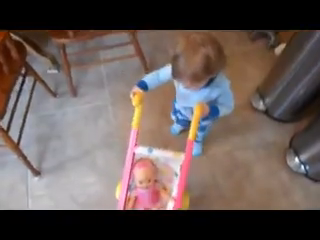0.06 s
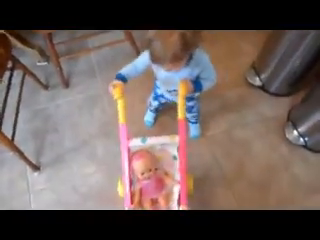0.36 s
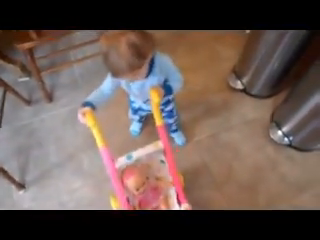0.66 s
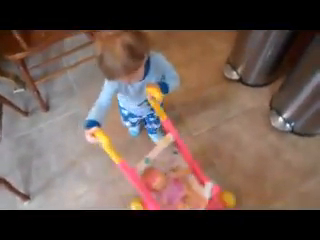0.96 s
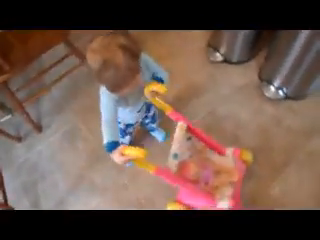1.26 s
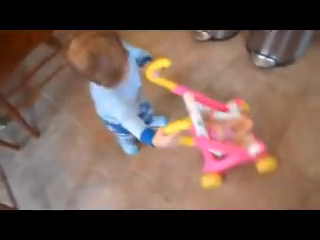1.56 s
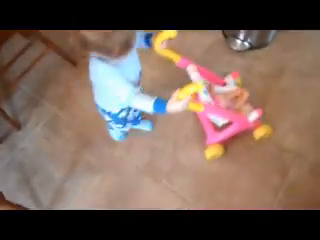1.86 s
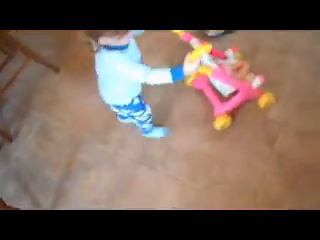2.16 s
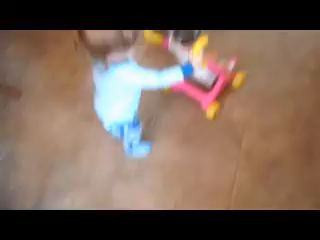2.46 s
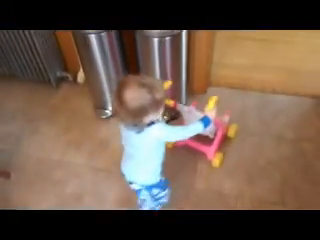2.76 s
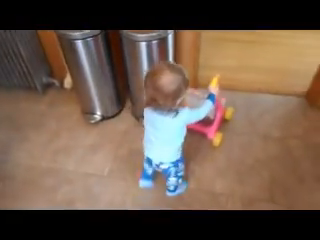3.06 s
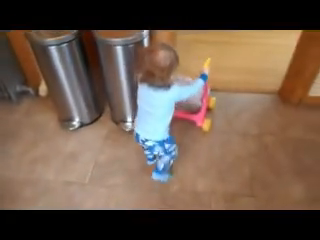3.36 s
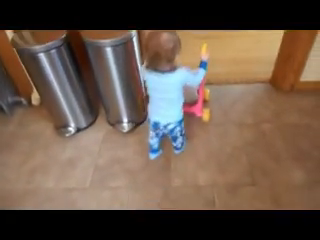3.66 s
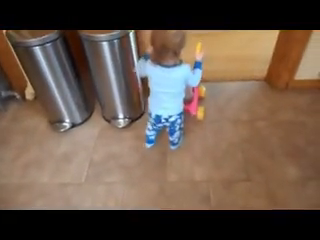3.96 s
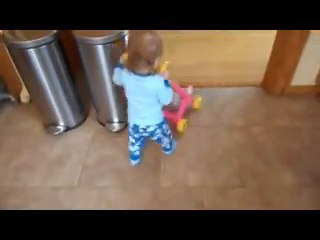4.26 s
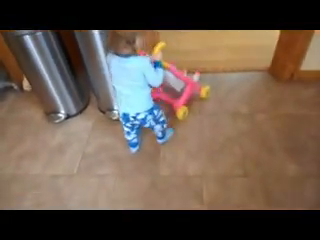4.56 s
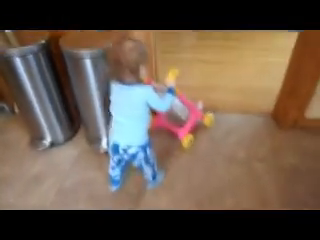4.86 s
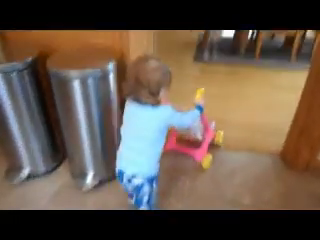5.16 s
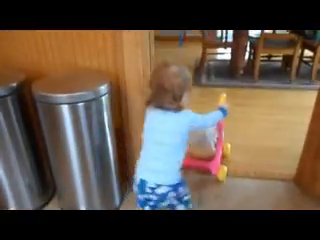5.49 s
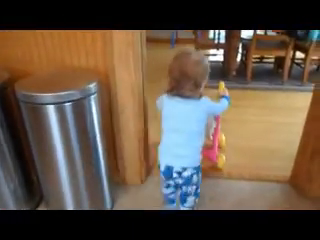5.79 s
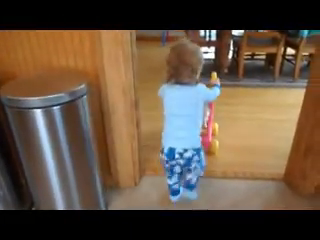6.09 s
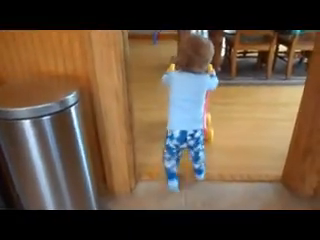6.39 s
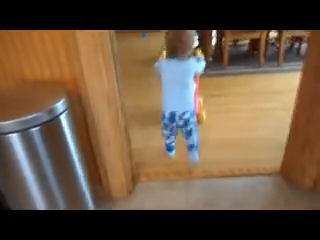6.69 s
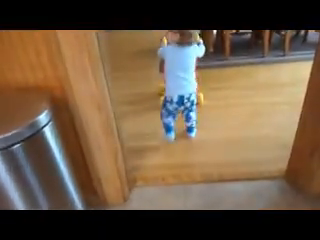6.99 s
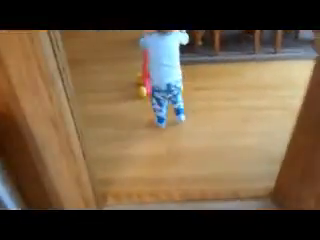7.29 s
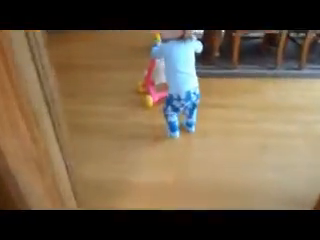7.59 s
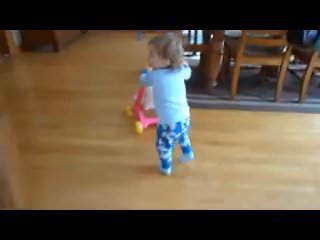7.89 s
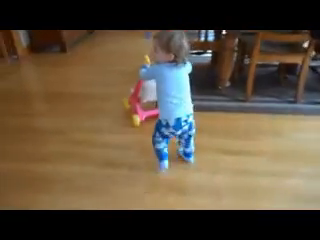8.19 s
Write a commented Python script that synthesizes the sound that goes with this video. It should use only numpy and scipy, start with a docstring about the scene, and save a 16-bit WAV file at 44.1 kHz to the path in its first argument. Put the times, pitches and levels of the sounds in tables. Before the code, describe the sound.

In a slightly echoing kitchen, plastic wheels scrub and squeal thinly on tile as a toy stroller rattles along, shove by shove. A hard bang against a door frame briefly overloads the hand-held microphone, and the rolling stops. The stroller then sets off again with several clacks and rolls more quietly over wooden boards. Faint hiss and hum lie underneath, and everything is heard in the left channel.

```python
"""A live kitchen, heard from a small hand-held camera following a toddler with a toy stroller; left channel only.
Over faint hiss and hum, hollow plastic wheels rumble, scrub and sing through a first turn on the tiles,
shove by shove, while the loose frame clacks and ticks. At 3.4 s the stroller hits a door frame: the
preamplifier overloads and the gain control ducks. After a pause the child pushes on, and from about 6 s
a wooden floor drums under the wheels."""
import sys
import numpy as np
from scipy import signal
from scipy.io import wavfile
from scipy.ndimage import uniform_filter1d

SR = 44100
rng = np.random.default_rng(int(sys.argv[2]) if len(sys.argv) > 2 else 0)


def file_out(sig):
    """Save sig as 16-bit WAV at sys.argv[1]."""
    # one column per channel
    cols = np.atleast_2d(sig).T
    # limit, then scale
    lim = np.clip(cols, -1, 1)
    pcm = np.round(lim * 32767).astype(np.int16)
    wavfile.write(sys.argv[1], SR, pcm)


N = 372204
TIME = np.arange(N) / SR

# resonances of the tube frame and of its small hard parts: pitch_hz, width_hz, boost_db
FRAME_MODES = [(545, 220, 2.5), (1032, 106, 14), (1850, 740, -3), (2160, 1700, 5.5), (3054, 230, 7.5),
               (4520, 97, 5), (5430, 57, 7.5)]
TICK_MODES = [(4800, 720, 6.5), (5400, 190, 5.3), (5800, 43, 11), (6600, 190, 3.7), (8200, 78, 14),
              (9580, 170, 13.3)]
# broad spectra of a knock and of a tick: frequency_hz, gain_db
KNOCK_SPECTRUM = [(40, -41.5), (130, -18.5), (220, -15.5), (500, -1), (700, 0), (1000, -0.5), (2600, 8.5),
                  (4000, -1), (6000, -3), (8500, -14.5), (10200, -30), (11500, -52)]
TICK_SPECTRUM = [(500, -26), (3000, 7.5), (3800, -13.5), (4700, 6), (6500, 5), (8600, -5.5), (10300, -21),
                 (11500, -50)]


def amp(db):
    """Decibels to gain."""
    return 10 ** (np.asarray(db) / 20)


def unit(x):
    """Scales to rms 1."""
    return x / np.sqrt(np.mean(x ** 2) + 1e-20)


def read(points, hz):
    """Reads a table on a log-frequency axis."""
    f, value = np.transpose(points)
    return np.interp(np.log(hz + 1), np.log(f + 1), value)


def add(mix, start_s, sound):
    """Mixes a sound in at its start time."""
    part = mix[max(round(start_s * SR), 0):][:len(sound)]
    part += sound[:len(part)]


def at_peak(x, db, size=256):
    """Scales a blow so that its loudest few milliseconds have this level."""
    return amp(db) * x / np.sqrt(uniform_filter1d(x ** 2, size).max() + 1e-20)


def body(spectrum, modes=(), size=4096):
    """Minimum-phase impulse response of a broad spectrum with resonances standing on it."""
    hz = abs(np.fft.fftfreq(size, 1 / SR))
    peaks = sum((amp(db) ** 2 - 1) / (1 + (2 * (hz - f) / width) ** 2) for f, width, db in modes)
    gain = amp(read(spectrum, hz)) * np.sqrt(np.maximum(1 + peaks, 0.1))
    return np.fft.ifft(np.exp(np.conj(signal.hilbert(np.log(gain))))).real


def ring(x, response):
    """Plays an excitation through a body."""
    return signal.oaconvolve(x, response)[:len(x)]


def resonate(x, hz, width_hz):
    """A resonance of gain 1 at a fixed or moving pitch."""
    carrier = np.exp(2j * np.pi * np.cumsum(hz * np.ones(len(x))) / SR)
    pole = np.exp(-np.pi * width_hz / SR)
    return 2 * (carrier * signal.lfilter([1 - pole], [1, -pole], x / carrier)).real


def wander(per_s):
    """A smooth random curve of rms 1."""
    knots = rng.standard_normal(N // 20)
    return unit(np.interp(TIME * per_s, np.arange(len(knots)), knots))


def contacts(per_s, spread_db):
    """Random tiny impacts, a few harder than the rest."""
    strength = amp(spread_db * np.minimum(rng.exponential(1, N), 4)) * rng.choice([-1, 1], N)
    return strength * (rng.random(N) < per_s / SR)


def chatter(t60, press_s=0.0051, softness=0.014, size=8192):
    """One blow: loose joints buzz during contact, then settle; a looser blow starts more softly."""
    t = np.arange(size) / SR
    onset = 1 - np.exp(-t / (softness * t60))
    decay = amp(-60 * np.maximum(t - press_s, 0) / t60)
    return rng.standard_normal(size) * onset * decay


def taps(part, per_s, spread_db, t60):
    """A part is tapped at an uneven beat and with uneven strength."""
    out = np.zeros(N)
    for beat, (late, strength) in enumerate(rng.random((400, 2))[:int(N / SR * per_s)]):
        tap = ring(chatter(t60, size=4096), part)
        add(out, (beat + late) / per_s, at_peak(tap, spread_db * (2 * strength - 1)))
    return out


def room_tone():
    """Steady hiss of the house and the faint hum of a kitchen appliance."""
    hiss_spectrum = [(18, -54), (30, -26), (108, -24.5), (304, -10.5), (335, -8.5), (370, -11), (1070, -10),
                     (1790, -13.5), (3230, -13), (3840, -12.5), (4670, -17), (8040, -25), (10800, -45),
                     (14000, -85), (22000, -120)]  # colour of the hiss: frequency_hz, gain_db
    hum_tones = [(339.1, -74)]  # the appliance: pitch_hz, level_db
    hiss = unit(ring(rng.standard_normal(N), body(hiss_spectrum)))
    hum = sum(amp(db) * np.sqrt(2) * np.sin(2 * np.pi * hz * TIME) for hz, db in hum_tones)
    return amp(-50) * hiss + hum


def microphone_rumble():
    """Low rumble and dull thumps at the microphone, two of them under hard knocks."""
    restlessness = [(0, -92), (3.0, -82), (4.0, -102), (6.5, -99), (7.3, -77), (8.44, -77)]  # rumble of the hand on the camera: time_s, level_db
    thumps = [(0.45, -78, .15), (3.35, -53, 0.15), (5.18, -51, .08), (7.08, -57, .15), (7.7, -59, .17),
              (8.33, -67, .16)]  # dull low thumps: start_s, level_db, length_s
    low_end = body([(10, 2), (30, -1), (70, -3), (200, -42), (800, -67)])
    rumble = unit(ring(rng.standard_normal(N), low_end))
    envelope = amp(np.interp(TIME, *np.transpose(restlessness)))
    for start_s, db, length_s in thumps:
        add(envelope, start_s, amp(db) * np.hanning(round(length_s * SR)))
    return envelope * rumble


def reflections(build_s=0.0045, echoes_per_s=4000):
    """Dense echoes from hard walls and floor, each band dying at its own speed."""
    decay_times = [(100, 0.71), (500, 0.4), (1000, 0.58), (3000, 0.49), (6000, 0.44), (10000, 0.34)]  # reverberation of the kitchen: frequency_hz, t60_s
    echoes = rng.standard_normal(SR) * (rng.random(SR) < echoes_per_s / SR)
    hz, t, bands = signal.stft(echoes, SR, nperseg=256)
    decay = amp(-60 * t / read(decay_times, hz)[:, None])
    tail = signal.istft(bands * decay, SR, nperseg=256)[1][:SR]
    tail *= 1 - np.exp(-np.arange(SR) / SR / build_s)
    return tail / np.linalg.norm(tail)


def kitchen_reverb(levels, wet_db, walls=3):
    """The frame sends a different sound toward each wall, so the echoes blend into a smooth tail."""
    tails = sum(ring(stroller(levels, roll_db=-0.5), reflections()) for _ in range(walls))
    return amp(wet_db) * tails / np.sqrt(walls)


def squeaks(gain_db, waver=0.029):
    """A wheel sticks and slips: a short chirp of unsteady pitch."""
    chirps = [(0.789, 0.044, 3500, -46), (1.063, 0.011, 3150, -44.5), (1.524, 0.01, 4420, -36),
              (1.917, 0.017, 1090, -38), (1.925, 0.017, 2970, -40.5), (2.281, 0.011, 2970, -42.5),
              (2.48, 0.03, 4530, -38), (2.914, 0.061, 1198, -42), (5.516, 0.028, 4130, -40)]  # sticking wheel: start_s, length_s, pitch_hz, relative_db
    out, drift = np.zeros(N), wander(per_s=860)
    for start_s, length_s, hz, db in chirps:
        bend = 1 + waver * drift[round(start_s * SR):][:round(length_s * SR)]
        tone = np.sin(2 * np.pi * np.cumsum(hz * bend) / SR)
        add(out, start_s, amp(db) * tone * signal.windows.tukey(len(bend), 0.6))
    return amp(gain_db) * out


def ticks(gain_db):
    """Small hard parts click with a high, short ring."""
    clicks = [(0.124, -40, 0.14), (0.4127, -50, 0.04), (1.081, -33, 0.042), (1.1603, -32, 0.056),
              (1.327, -30.5, 0.027), (1.409, -30, 0.037), (1.5233, -25.5, 0.032), (1.5474, -27, 0.034),
              (1.5747, -23, 0.028), (1.9764, -37, 0.28), (2.413, -31.5, 0.058), (2.4856, -28, 0.11),
              (2.6146, -21, 0.019), (2.706, -25, 0.032), (3.1852, -29.5, .025), (4.287, -40, 0.055),
              (4.732, -32, 0.026), (4.853, -19.5, 0.046), (4.964, -28, 0.094), (5.136, -34, 0.044),
              (5.4307, -20, 0.016), (6.331, -41, 0.074), (7.09, -41, 0.063), (7.7808, -43.5, 0.043)]  # loose parts: start_s, relative_db, t60_s
    out, part = np.zeros(N), body(TICK_SPECTRUM, TICK_MODES)
    for start_s, db, t60 in clicks:
        add(out, start_s, at_peak(ring(chatter(t60), part), db))
    return amp(gain_db) * out


def rolling_levels(rise_s=0.065, swell_db_per_s=1.5, coast_db_per_s=93.5):
    """Gains of rumble, rattle and scrub: each shove rises, holds and coasts; skids add scrub."""
    shoves = [(-0.1, 0.092, -40, -42, -39.5), (0.075, 0.081, -48.5, -49, -44),
              (0.575, 0.14, -51, -52.5, -52.5), (0.779, 0.46, -51, -63, -45.5),
              (1.15, 0.34, -40.5, -40.5, -42), (1.475, .27, -38.5, -40.5, -41.5),
              (1.943, 0.23, -43.5, -36.5, -45), (2.307, .44, -41.5, -36, -42), (2.808, 0.64, -43, -34, -55),
              (4.273, .06, -48.5, -41, -45), (4.358, 0.15, -34, -27, -41.5), (4.768, 0.35, -46, -41.5, -45),
              (4.945, 0.14, -38.5, -31.5, -54), (5.157, 0.18, -37, -27, -39), (5.471, 0.046, -35, -42, -51),
              (5.716, 0.42, -45, -39.5, -52.5), (6.234, 0.84, -50, -42, -58.5),
              (7.028, 0.67, -52, -44, -63), (7.968, 0.27, -52.5, -50, -53),
              (8.135, 0.25, -47.5, -41.5, -64)]  # the child's pushes: start_s, length_s, rumble_db, rattle_db, scrub_db
    skids = [(0.117, 0.043, -37.5), (0.598, 0.041, -53), (0.78, .04, -53), (0.832, .04, -49),
             (6.802, 0.031, -34), (7.549, 0.062, -38.5), (7.646, 0.052, -40)]  # a wheel slides briefly: start_s, length_s, scrub_db
    levels = np.zeros((3, N))
    for start_s, length_s, *dbs in shoves:
        t = TIME - start_s
        swell_db = swell_db_per_s * np.clip(t, 0, length_s)
        coast_db = coast_db_per_s * np.maximum(t - length_s, 0)
        speed = np.clip(t / rise_s, 0, 1) * amp(swell_db - coast_db)
        levels = np.maximum(levels, amp(dbs)[:, None] * speed)
    for start_s, length_s, db in skids:
        slide = np.interp(TIME - start_s, [0, 0.005, length_s / 2, length_s], [0, 1, 0.7, 0])
        levels[2] += amp(db) * slide
    return levels


def wheel_song(scrub_gain, gain_db, width_hz=190, upper_hz=4400, flutter_db=5):
    """Stick and slip drive two modes of a dragged wheel; the upper one grows as the turn tightens."""
    first_turn = [(0.0, -6, 3014), (1.1, -2, 3060), (1.45, -2, 3000), (1.85, -4.5, 2910), (2.3, -25, 3020)]  # the lower mode through the turn: time_s, relative_db, pitch_hz
    time_s, db, hz = np.transpose(first_turn)
    slips = rng.standard_normal(N) * amp(2 * wander(per_s=100) + flutter_db * wander(per_s=25))
    lower, upper = (unit(resonate(resonate(slips, pitch, width_hz), pitch, width_hz))
                    for pitch in (np.interp(TIME, time_s, hz), upper_hz))
    upper_db = np.interp(TIME, [0.78, 0.88], [-13, -4])
    turn_db = np.interp(TIME, time_s, db, right=-120)
    return scrub_gain * amp(gain_db + turn_db) * (lower + amp(upper_db) * upper)


def wheel_wobble(levels, knock_db, tick_db):
    """Loose wheels knock on their axles as the stroller rattles, and tick when they are dragged."""
    _, rattle_gain, scrub_gain = levels
    hollow_mode = (1060, 300, 10)  # ring of a tapped wheel: pitch_hz, width_hz, boost_db
    floor_db = np.interp(TIME, [6.0, 6.3], [0, 1])  # harder taps on the wooden boards
    knocking = taps(body(KNOCK_SPECTRUM, FRAME_MODES + [hollow_mode]), per_s=14, spread_db=0.5, t60=0.042)
    ticking = taps(body(TICK_SPECTRUM, TICK_MODES), per_s=11, spread_db=-1, t60=0.03)
    return amp(knock_db + floor_db) * rattle_gain * knocking + amp(tick_db) * scrub_gain * ticking


def wheels(levels):
    """Floor grit and axle play pelt the wheels and frame; dragged wheels scrub sideways."""
    # broad spectra of wheels, boards, frame and dragged treads: frequency_hz, gain_db
    rumble_spectrum = [(40, -57), (110, -17.5), (200, -10), (330, -4), (480, 5), (720, 1), (1100, 1),
                       (2500, -42.5)]
    board_spectrum = [(40, -17.5), (75, -5.5), (120, -0.5), (210, 7), (300, -4), (600, -41)]
    rattle_spectrum = [(150, -22.5), (500, -31.5), (900, 2.5), (1200, 7), (2300, 5.5), (3200, 1), (3900, 1),
                       (5500, -3), (8000, -14.5), (11000, -46)]
    scrub_spectrum = [(200, -28.5), (900, -2.5), (2000, -0.5), (3700, -2), (5000, 0.5), (7000, -0.5),
                      (8800, -6), (10200, -21), (11500, -47.5)]
    wheel_modes = [(1006, 310, 10), (3030, 240, 11.4), (4470, 220, 7.2), (5120, 140, 8.6), (5660, 250, 7.9),
                   (6430, 210, 3), (8260, 460, 1.8)]  # hollow plastic resonances: pitch_hz, width_hz, boost_db
    board_share = [(5.5, -38), (6.0, -17.5), (6.6, -11.5), (8.44, -14)]  # wood drums, tiles do not: time_s, level_re_rumble_db
    rumble_gain, rattle_gain, scrub_gain = levels
    jolts = wander(per_s=70)  # uneven treads shake all parts together
    bumps = contacts(per_s=2200, spread_db=1) * amp(2.5 * jolts)
    boom = amp(np.interp(TIME, *np.transpose(board_share))) * unit(ring(bumps, body(board_spectrum)))
    rumble = unit(ring(bumps, body(rumble_spectrum))) + boom
    shakes = contacts(per_s=1000, spread_db=2) * amp(2.04 * jolts)
    rattle = unit(ring(shakes, body(rattle_spectrum, FRAME_MODES)))
    slips = contacts(per_s=4000, spread_db=3) * amp(jolts + 2 * wander(per_s=160))
    scrub = unit(ring(slips, body(scrub_spectrum, wheel_modes)))
    return amp(4.5) * (rumble_gain * rumble + rattle_gain * rattle) + amp(7) * scrub_gain * scrub


def knocks(gain_db, mode_db=10, mode_width_hz=300):
    """Each blow rings the frame; where it lands picks a boosted mode and the share of thud and crack."""
    # blows, the hardest at the doorway: start_s, mid_db, thud_re_mid_db, crack_re_mid_db, t60_s, mode_hz
    blows = [(0.3536, -40.5, -10, -13, 0.058, 3560), (1.1823, -13, -7, -15, 0.035, 2660),
             (1.1935, -22, -1, 0, 0.017, 3050), (1.3896, -29, -13, -26, 0.085, 2900),
             (1.575, -27, -7.5, -26, .04, 2920), (1.643, -23.5, -5, -26, 0.026, 2360),
             (1.9199, -32.5, -3.5, -7, 0.11, 1090), (2.0615, -24, -9, -4.5, 0.068, 2900),
             (2.0857, -27, -7, -10.5, 0.075, 2860), (2.133, -24.5, -3, -9.5, 0.077, 2320),
             (2.1614, -25, -2.5, -25, 0.052, 2220), (2.6217, -12.5, -9.5, -5.5, 0.033, 2220),
             (2.792, -25.5, -4, -18, 0.048, 1220), (2.8775, -18.5, -6.5, -8.5, 0.11, 1170),
             (2.8996, -29, 2.5, -18, .085, 1030), (3.0585, -24.5, -25, -6, 0.032, 2250),
             (3.309, -16, -6, -9, 0.2, 1030), (3.3844, 0.5, -16.5, -4.5, 0.076, 2620),
             (3.389, -1, -7.5, -2, 0.33, 3230), (3.398, -1.5, -14, -5.5, 0.14, 2700),
             (3.411, 3, -7, -12.5, 0.16, 2220), (3.544, -14, -14, -4.5, 0.11, 2400),
             (4.384, -10, -11, -5, 0.1, 2740), (4.4201, -12, -8, -9, 0.066, 2950),
             (4.5402, -15.5, -1, -12, .028, 1050), (4.9857, -9, -5.5, -12.5, 0.05, 2970),
             (5.213, -6.5, -9, -6.5, 0.05, 1160), (5.2567, -7.5, -7, -9, 0.021, 1100),
             (5.5024, -20.5, -3, -9, 0.091, 1140), (5.5282, -16, -10, -7, 0.11, 2760),
             (5.7066, -8, -7, -8, 0.021, 2990), (5.836, -15.5, -5.5, -11, 0.056, 1005),
             (5.916, -28, 2.5, -6, 0.043, 1040), (5.9512, -8.5, -9, -10, .025, 2300),
             (6.0814, -24.5, -2.5, -3, .037, 2080), (6.3451, -42, 6.5, -4, 0.054, 1050),
             (6.4678, -26.5, -3, -11.5, 0.072, 1030), (6.7201, -35, -2, -10, 0.11, 1170),
             (6.9876, -29.5, -6, -10, 0.073, 2520), (7.1374, -36.5, -2, -19, 0.053, 1130),
             (7.2813, -34.5, -6, -7.5, 0.11, 2500), (7.375, -31, -4.5, -15, 0.028, 1050),
             (7.9029, -32, -6, -8.5, 0.067, 2480), (7.9747, -35.5, -5, -14, 0.1, 2360),
             (8.1787, -30.5, -8, -6.5, 0.17, 1030), (8.2305, -20.5, -5.5, -19, 0.062, 2200)]
    bands = [signal.butter(3, edge_hz, kind, fs=SR, output="sos")
             for edge_hz, kind in [(1500, "low"), ((1500, 4000), "band"), (4000, "high")]]
    out = np.zeros(N)
    for start_s, db, thud_db, crack_db, t60, hz in blows:
        frame = body(KNOCK_SPECTRUM, FRAME_MODES + [(hz, mode_width_hz, mode_db)])
        blow = ring(chatter(t60), frame)
        thud, mid, crack = (signal.sosfilt(band, blow) for band in bands)
        add(out, start_s, at_peak(thud, db + thud_db) + at_peak(mid, db) + at_peak(crack, db + crack_db))
    return amp(gain_db) * out


def stroller(levels, roll_db):
    """Everything the stroller radiates in one direction."""
    rolling = wheels(levels) + wheel_wobble(levels, knock_db=6, tick_db=1.5)
    rolling += wheel_song(scrub_gain=levels[2], gain_db=5.5)
    return amp(roll_db) * rolling + knocks(gain_db=2.5) + ticks(gain_db=1.5) + squeaks(gain_db=14)


def scene():
    """The stroller and the kitchen as they reach the microphone, on the left channel."""
    levels = rolling_levels()
    direct = stroller(levels, roll_db=-4)
    left = direct + kitchen_reverb(levels, wet_db=-3.5) + room_tone() + microphone_rumble()
    return np.array([left, np.zeros(N)])


def gain_control(x, limit_db, attack_s, recover_s, size=44):
    """Output peaks over the limit pull the camera's gain down; it creeps back as the sound dies."""
    peaks_db = 20 * np.log10(np.maximum.reduceat(abs(x), np.arange(0, N, size)) + 1e-9)
    step_s, duck_db, ducks = size / SR, 0.0, []
    for peak_db in peaks_db:
        over_db = min(peak_db - duck_db, 0) - limit_db  # the detector saturates at full scale
        if over_db > 0:
            duck_db += over_db * step_s / attack_s
        else:
            duck_db *= np.exp(-step_s / recover_s)
        ducks.append(duck_db)
    return x / amp(np.interp(TIME, (np.arange(len(ducks)) + 1) * step_s, ducks))


def record(dry, bass_hz=150, bass_loss=0.21, edge_hz=10700, top_hz=16000):
    """The camera: gain control, an overloading preamplifier, thin bass, a band limit and a ceiling."""
    held = gain_control(dry[0], limit_db=-14.5, attack_s=0.049, recover_s=0.098)
    overloaded = np.clip(held, -1, 1)
    bass = signal.filtfilt(*signal.butter(2, bass_hz, fs=SR), overloaded)
    band_limit = signal.firwin(129, edge_hz, window=("kaiser", 8), fs=SR)
    narrow = signal.oaconvolve(overloaded - bass_loss * bass, band_limit, "same")
    top_cut = signal.firwin(255, top_hz, window=("kaiser", 9), fs=SR)
    left = signal.oaconvolve(np.clip(narrow, -1, 1), top_cut, "same")
    return np.array([np.clip(left, -1, 1), dry[1]])


dry = scene()
out = record(dry)
file_out(out)
```